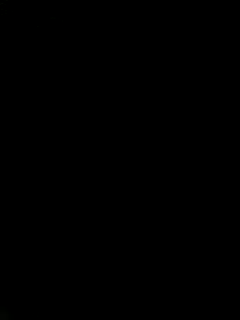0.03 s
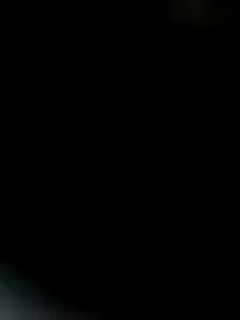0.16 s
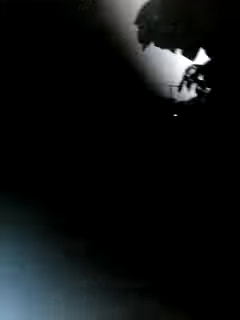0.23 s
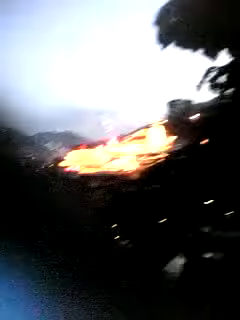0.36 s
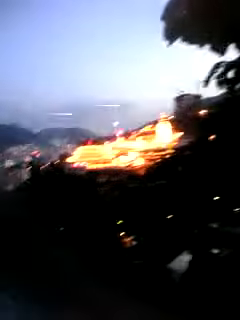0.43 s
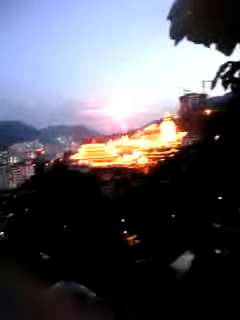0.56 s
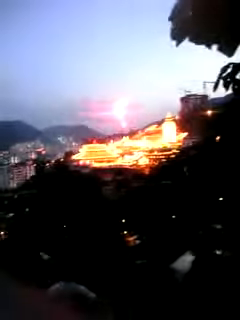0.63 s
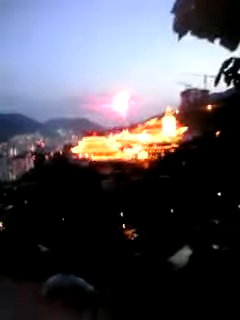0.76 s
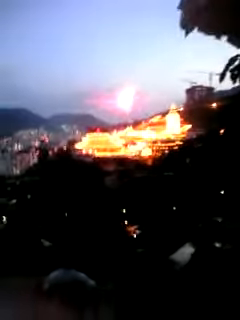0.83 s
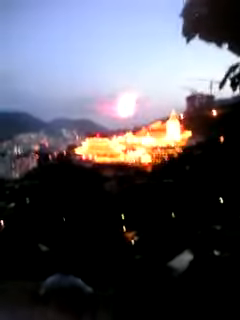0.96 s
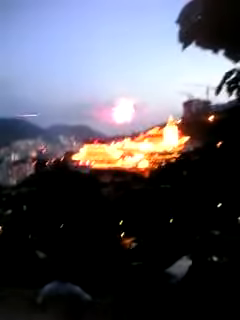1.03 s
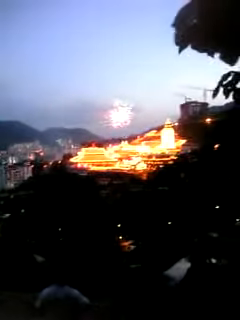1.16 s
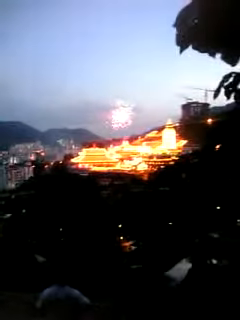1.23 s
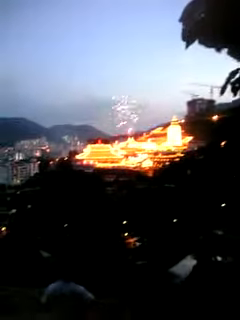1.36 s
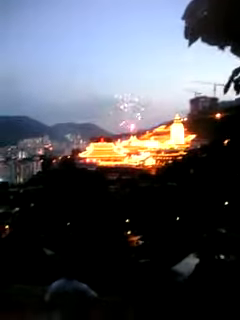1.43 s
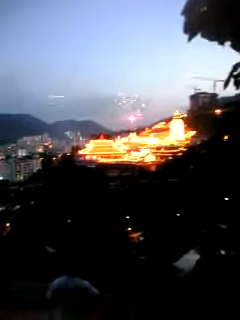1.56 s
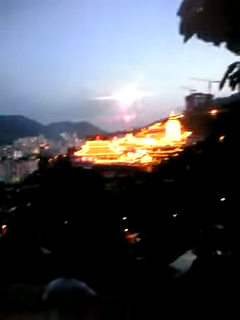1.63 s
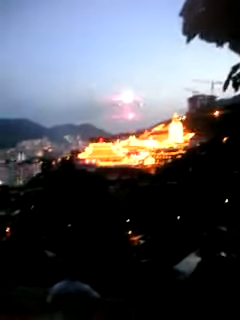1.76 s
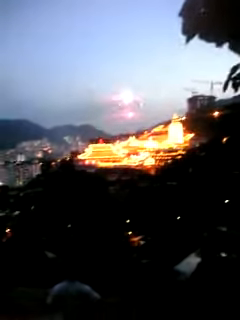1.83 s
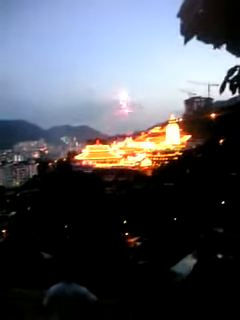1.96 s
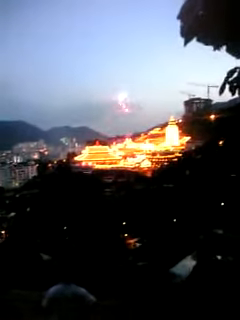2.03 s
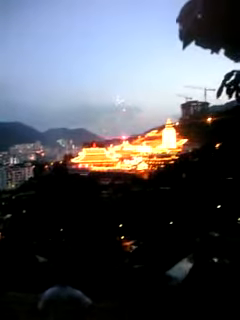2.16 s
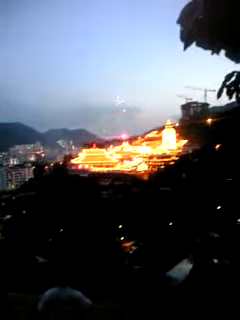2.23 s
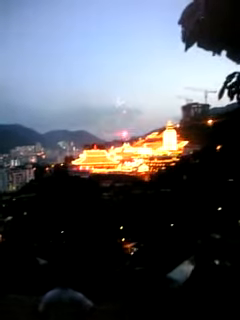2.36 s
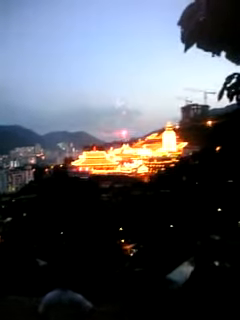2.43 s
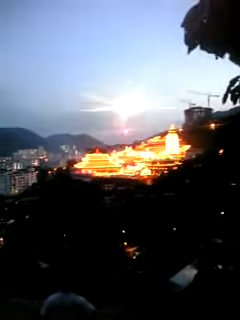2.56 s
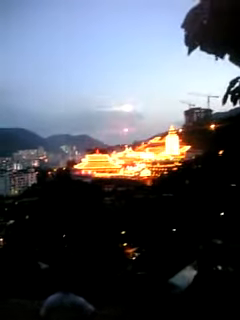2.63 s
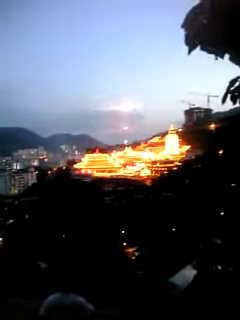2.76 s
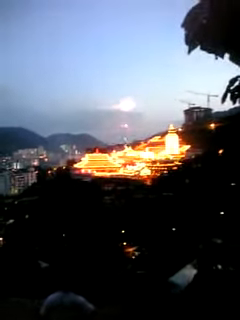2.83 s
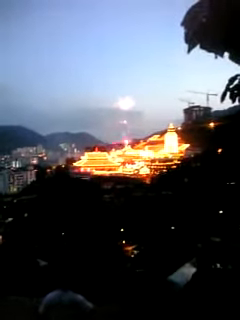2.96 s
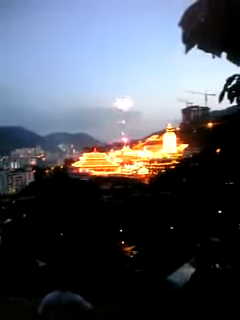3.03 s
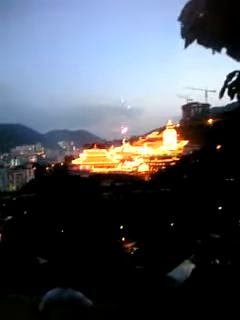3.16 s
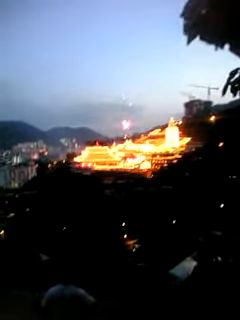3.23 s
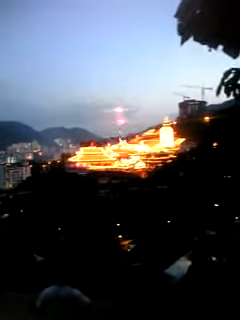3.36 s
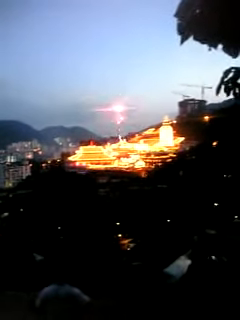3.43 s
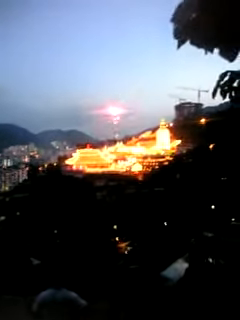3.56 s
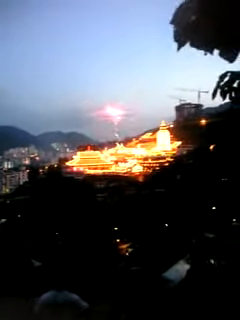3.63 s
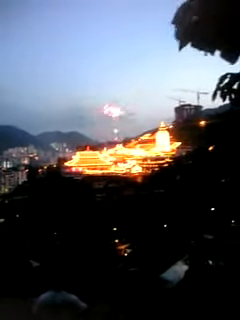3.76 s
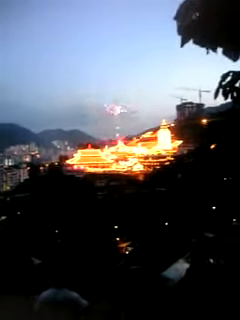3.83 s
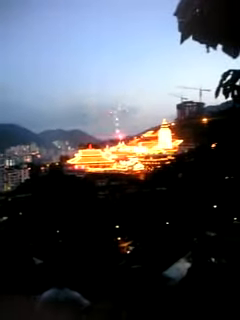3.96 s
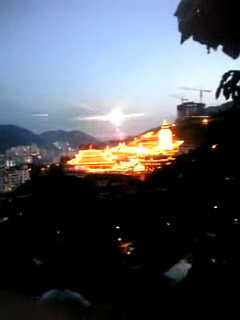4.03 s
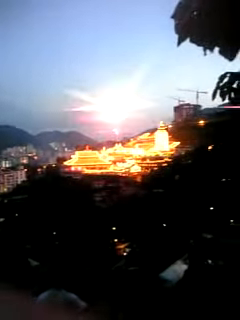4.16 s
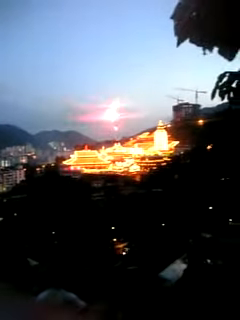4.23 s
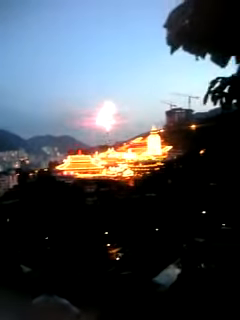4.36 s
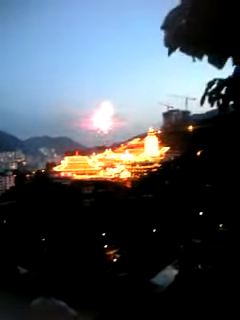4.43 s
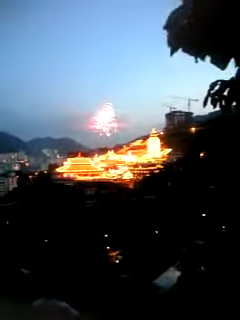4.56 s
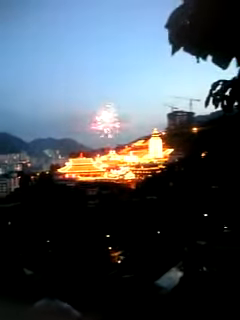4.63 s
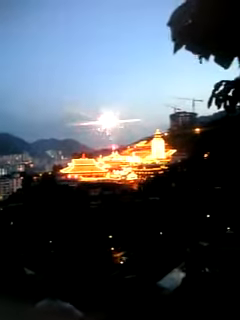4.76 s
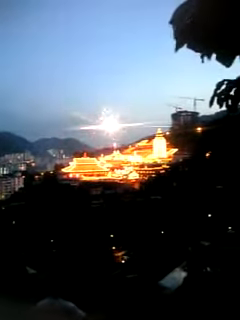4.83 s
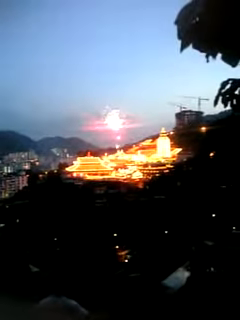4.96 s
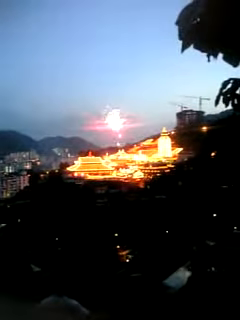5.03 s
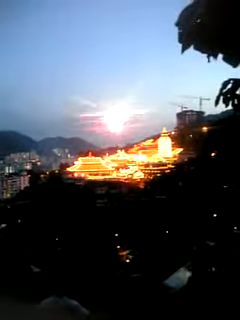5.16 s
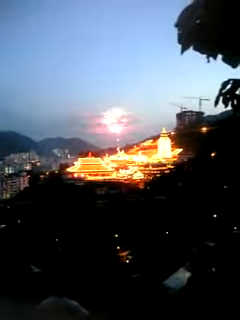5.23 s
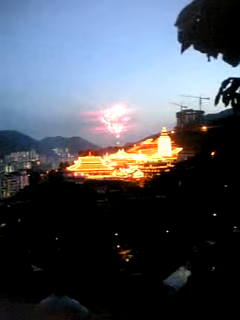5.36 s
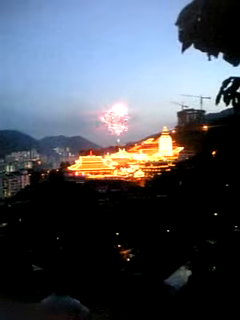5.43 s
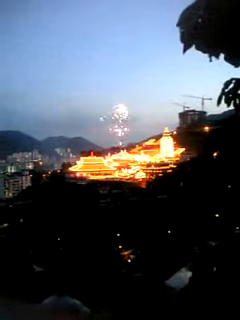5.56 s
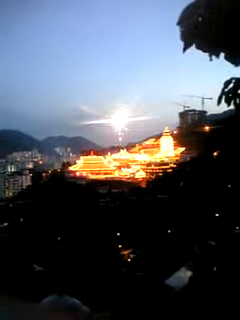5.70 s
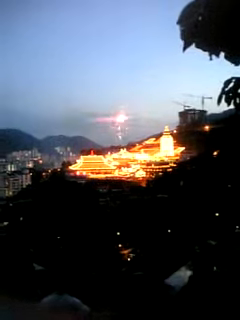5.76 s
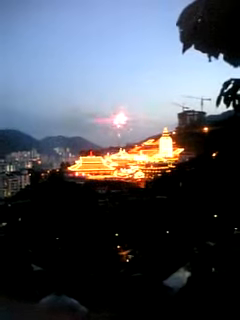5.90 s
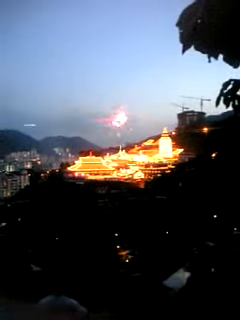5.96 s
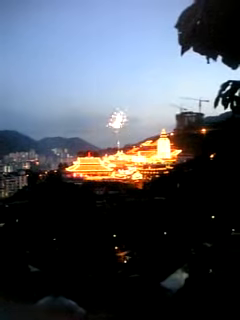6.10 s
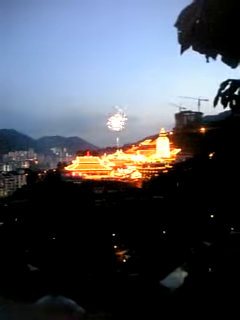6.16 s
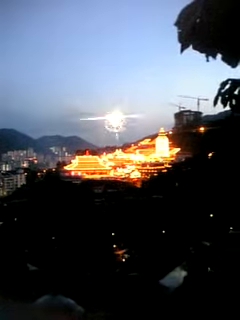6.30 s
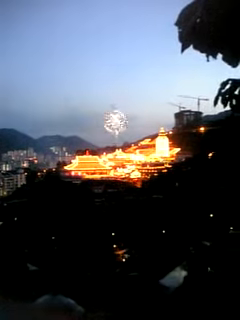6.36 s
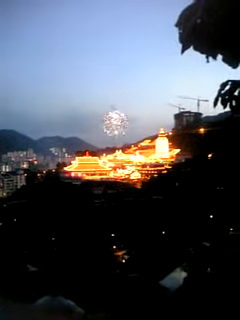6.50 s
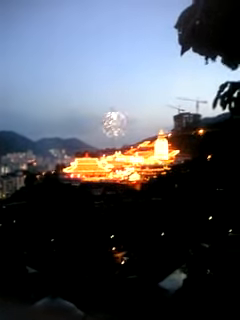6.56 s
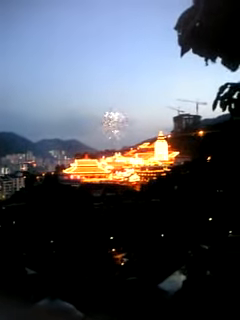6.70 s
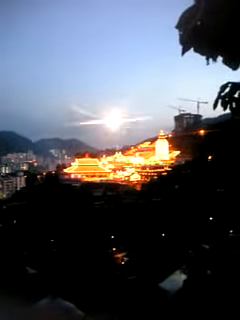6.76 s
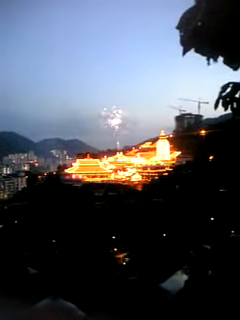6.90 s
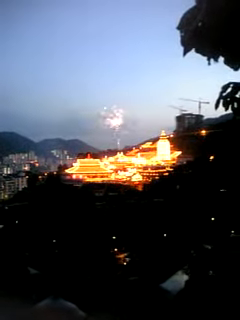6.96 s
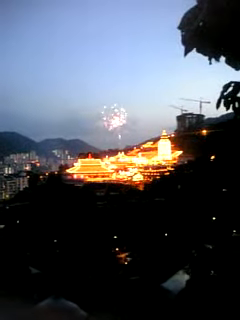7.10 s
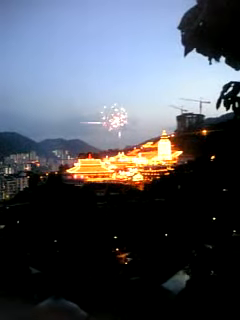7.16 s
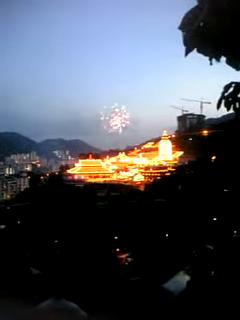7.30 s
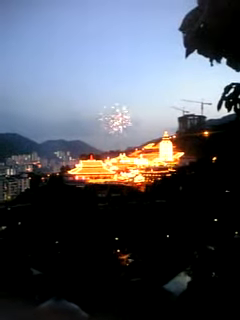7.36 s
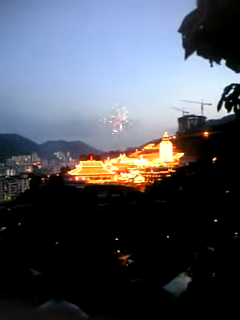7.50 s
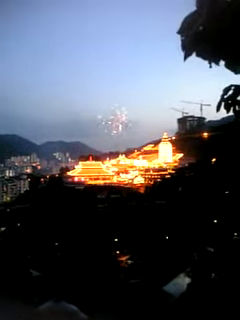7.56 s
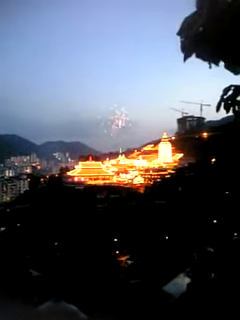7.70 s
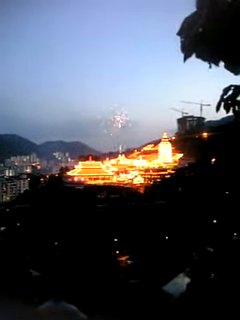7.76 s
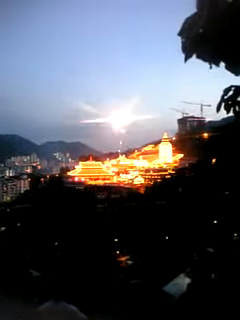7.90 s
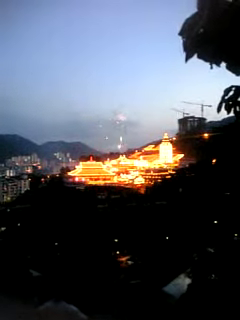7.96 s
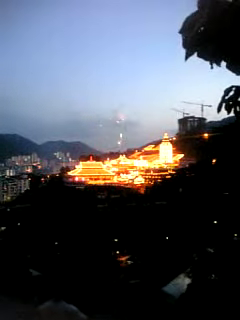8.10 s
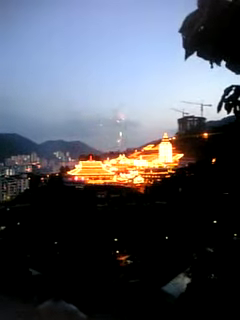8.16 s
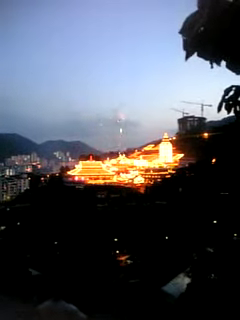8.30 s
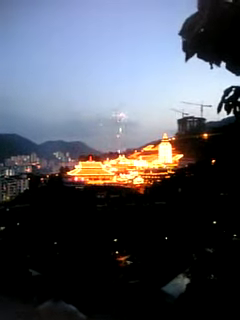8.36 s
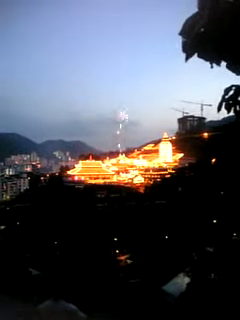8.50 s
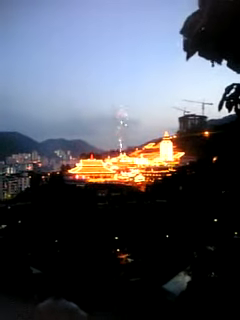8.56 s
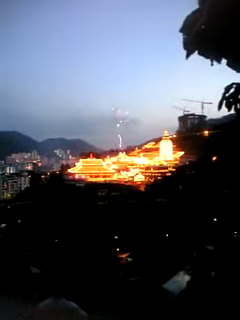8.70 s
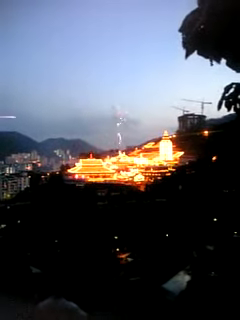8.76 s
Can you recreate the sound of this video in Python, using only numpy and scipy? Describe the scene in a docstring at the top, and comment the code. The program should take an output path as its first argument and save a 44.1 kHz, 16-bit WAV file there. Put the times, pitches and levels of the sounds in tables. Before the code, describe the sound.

Loud firework shells bang in quick volleys across a valley, with crackling and long rolling echoes.

```python
"""Firework shells burst in volleys over a hillside town, heard from across a valley.
Each blast rings the case of a small microphone and overloads it. A facade and the houses behind it
slap it back, and the slopes scatter it into a crackling wash and a long rolling echo.
Single stars crack in the gaps, over a bed of rumble and crackle from fireworks further off."""
import sys
import numpy as np
from scipy import signal
from scipy.fft import rfft, irfft, next_fast_len
from scipy.io import wavfile
from scipy.ndimage import uniform_filter1d

SR = 44100
rng = np.random.default_rng(int(sys.argv[2]) if len(sys.argv) > 2 else 0)


def store_wav(level_fs):
    """Save 16-bit WAV to argv[1]."""
    pcm = np.round(np.clip(np.atleast_2d(level_fs), -1, 1) * 32767)
    wavfile.write(sys.argv[1], SR, pcm.T.astype(np.int16))


N = 388962

# shell bursts; facade_db is relative to the burst:
# start_s, blast_db, facade_lag_s, facade_db, crackle_db, sizzle_db, valley_db
SHELL_BURSTS = [(.397, 5, 0.055, -1, -11.5, -30, -18), (1.27, -7, 0.059, -12, -25.5, -42, -35.5),
                (1.569, 8.5, 0.055, -2.5, -7.5, -22, -14.5), (1.688, 7.5, 0.054, -2.5, -9.5, -24, -16),
                (2.183, 5.5, .044, -1.5, -11, -27, -17.5), (2.791, 3, 0.059, -3, -13, -32, -22),
                (3.142, -14.5, 0.042, -12.5, -27, -44, -44.5), (3.614, 1.5, 0.073, -19.5, -17, -42, -28),
                (3.895, 1.5, 0.051, 2, -12.5, -15.5, -17.5), (4.571, 2, .055, -21, -14, -34, -31),
                (4.702, 3.5, 0.05, -4, -13.5, -33, -20.5), (5.465, 6.5, 0.072, -4.5, -16.5, -25, -24.5),
                (5.507, 8.5, 0.056, -5.5, -13.5, -34, -14.5), (5.602, 3.5, 0.06, -2, -13.5, -24, -27.5),
                (5.791, 5.5, 0.051, 1.5, -14.5, -25.5, -19.5), (6.241, 5.5, .055, -1, -14, -27, -14.5),
                (6.337, 5, .052, -4.5, -13, -30, -25.5), (6.667, 5.5, .055, -6.5, -11.5, -27.5, -16),
                (6.761, 4.5, 0.058, -6.5, -10, -20.5, -19), (7.326, 3, 0.051, -1.5, -10, -19.5, -20.5),
                (7.641, 2, 0.045, 1.5, -13.5, -22.5, -17), (8.007, 3, 0.055, -1.5, -16.5, -24.5, -20.5),
                (8.514, 5, 0.047, 0.5, -13, -20, -16)]
# slaps off the facade and the houses behind it, relative to the facade echo: lag_s, boom_db, crackle_db
HOUSE_SLAPS = [(0, -1.5, -1.5), (.017, -4, -10.5), (.038, -6, -14.5), (.093, -15.5, -17)]
# lone cracks between the bursts, plus the sharp crack of the faint burst at 1.27 s: start_s, level_db,
# pitch_hz, width_hz, t60_s
STAR_CRACKS = [(.210, -8, 1130, 880, 0.018), (0.805, -11, 1040, 504, 0.035),
               (.948, -16.5, 2630, 700, 0.046), (1.271, -19, 1390, 1500, 0.044),
               (1.521, -19, 2170, 1500, .04), (3.341, -24, 2680, 1500, 0.03), (3.499, -25, 2290, 1490, .04),
               (5.077, -18, 1100, 790, .027), (7.263, -23, 1960, 1780, 0.073),
               (8.227, -14.5, 2320, 1174, 0.48), (8.259, -7.5, 2290, 1300, 0.079)]
# level ride of the far fireworks, busier toward the end: time_s, rumble_db, crackle_db
FAR_LEVELS = [(0, -25, -31), (1.3, -30, -38.5), (2.5, -25, -34), (3.1, -27.5, -34), (3.7, -29, -36),
              (5.4, -30, -34), (6.1, -23.5, -27), (8.8, -23, -33)]
# tone of the far thuds: frequency_hz, level_db
FAR_THUD_EQ = [(30, -29.5), (90, -20), (180, -17), (260, -5), (330, 2.5), (470, -2.5), (650, -13),
               (1100, -24), (2000, -44.5)]
# tone of the far crackle: frequency_hz, level_db
FAR_CRACKLE_EQ = [(200, -23.5), (600, 4), (1050, 8.5), (1800, 1.5), (3300, -5.5), (3900, -31.5),
                  (4700, -33)]
# tone of the valley echo: frequency_hz, level_db
VALLEY_EQ = [(30, -28.5), (90, -20), (180, -19.5), (310, 6.5), (430, 3.5), (680, -11), (1050, -2),
             (1600, -16), (2500, -16), (3300, -22.5), (3900, -49), (4700, -46)]
# tone of the near scatter: frequency_hz, level_db
SCATTER_EQ = [(30, -38.5), (90, -11.5), (180, -13.5), (320, 0), (450, 6), (680, -7), (1050, -3.5),
              (1600, -10), (2500, -11), (3300, -15), (3900, -36.5), (4700, -43.5)]
# tone of the pressure wave: frequency_hz, level_db
BLAST_EQ = [(30, -44), (90, -18.5), (180, 3.5), (270, 8), (340, -1), (470, 5.5), (680, -5), (1050, -5),
            (1800, -5), (3300, -15.5), (3900, -38.5), (4700, -11.5)]

VALLEY_LAG_S, VALLEY_RISE_S, VALLEY_T60_S = .025, 0.062, 1.996
WALL_LAG_S, WALL_BOOM_DB, WALL_CRACKLE_DB = .023, -10, -6.5  # a wall close by answers first
SNAP_HZ, SNAP_WIDTH_HZ, SNAP_T60_S, SNAP_DB = 1280, 1410, 0.044, -2  # level relative to the crackle
SIZZLE_HZ, SIZZLE_WIDTH_HZ, SIZZLE_RISE_S, SIZZLE_T60_S = 2700, 1500, 0.0052, .25
CASE_HZ, CASE_T60_S, CASE_DB = 334, 0.04, 3
SWITCH_ON_S, BANDWIDTH_HZ, TOP_HZ = .069, 4900, 16000
CEILING, KNEE = .72, .08
SHELF_HZ, SHELF_DB = 4320, -6.5
RASP_HZ, RASP_WIDTH_HZ, RASP_DB = 7970, 1500, -11.5  # the input lifts a narrow band near 8 kHz


def undb(db):
    """Decibels to gain."""
    return 10 ** (np.asarray(db) / 20)


def unit_rms(x):
    """Scale to rms 1."""
    return x / np.sqrt(np.mean(x ** 2))


def add(track, start_s, sound):
    """Mix a sound into a track from start_s on."""
    i = max(int(start_s * SR), 0)
    track[i:i + len(sound)] += sound[:N - i]


def equalise(x, curve, size=4096):
    """Causal EQ of unit power gain, shaped by (frequency_hz, level_db) points."""
    hz, db = np.transpose(curve)
    bin_hz = np.arange(size // 2 + 1) * SR / size
    gain = undb(np.interp(np.log(bin_hz + 1), np.log(hz), db))
    # minimum phase keeps the attacks sharp
    cepstrum = irfft(np.log(gain))
    cepstrum[1:size // 2] *= 2
    cepstrum[size // 2 + 1:] = 0
    response = irfft(np.exp(rfft(cepstrum)))
    return signal.fftconvolve(x, response / np.linalg.norm(response))[:len(x)]


def band(x, hz, width_hz):
    """Steep band-pass around a centre frequency."""
    high = (width_hz + np.hypot(width_hz, 2 * hz)) / 2
    return signal.sosfilt(signal.butter(3, [high - width_hz, high], "bandpass", fs=SR, output="sos"), x)


def mic_rolloff(x, cutoff_hz=3780):
    """The microphone's narrow band dulls the top of each crack."""
    return signal.sosfilt(signal.butter(6, cutoff_hz, fs=SR, output="sos"), x)


def clicks(per_s, spread_db):
    """A random hail of clicks of unequal size, rms 1."""
    arrives = rng.random(N) < per_s / SR
    strength = undb(spread_db * np.clip(rng.standard_normal(N), -2, 2))
    return unit_rms(arrives * strength * rng.choice([-1, 1], N))


def swell(rise_s, t60_s, size=SR):
    """An envelope that builds up and dies away."""
    t = np.arange(size) / SR
    return (1 - np.exp(-t / rise_s)) * np.exp(-np.log(1000) * t / t60_s)


def flutter(rate_hz, depth_db):
    """A gain that wanders at random, about rate_hz times a second."""
    hold = int(SR / rate_hz)
    steps = np.repeat(rng.standard_normal(N // hold + 1), hold)[:N]
    return undb(depth_db * uniform_filter1d(steps, hold))


def shimmer(x, rate_hz, depth_db, count=18):
    """Reflections interfere: each narrow band swells and fades on its own."""
    size = next_fast_len(N)
    bin_hz = np.arange(size // 2 + 1) * SR / size
    band_index = np.interp(np.log(bin_hz + 1), np.log([250, 3600]), [0, count - 1])
    spectrum = rfft(x, size)
    masks = (np.maximum(1 - np.abs(band_index - k), 0) for k in range(count))
    return sum(irfft(spectrum * mask, size)[:N] * flutter(rate_hz, depth_db) for mask in masks)


def pile_up(starts_s, levels_db, envelope):
    """Joint envelope of overlapping hits: their powers add up."""
    power = np.zeros(N)
    for start_s, level_db in zip(starts_s, levels_db):
        add(power, start_s, (undb(level_db) * envelope) ** 2)
    return np.sqrt(power)


def arrivals():
    """Each burst lands directly, off the near wall, then off the houses: start_s, boom_db, crackle_db."""
    rows = []
    for start_s, blast_db, facade_lag_s, facade_db, crackle_db, _, _ in SHELL_BURSTS:
        houses = np.array(HOUSE_SLAPS) + (facade_lag_s, facade_db, facade_db)
        paths = [(0, 0, 0), (WALL_LAG_S, WALL_BOOM_DB, WALL_CRACKLE_DB), *houses]
        rows.extend(np.array(paths) + (start_s, blast_db, crackle_db))
    return np.array(rows)


def far_fireworks():
    """The bed: overlapping dull thuds and a fine crackle from further off."""
    time_s, *levels_db = np.transpose(FAR_LEVELS)
    rumble_db, crackle_db = (np.interp(np.arange(N) / SR, time_s, db) for db in levels_db)
    thuds = equalise(clicks(per_s=400, spread_db=4.0) * undb(rumble_db), FAR_THUD_EQ)
    crackle = equalise(clicks(per_s=2500, spread_db=0.5) * undb(crackle_db), FAR_CRACKLE_EQ)
    return thuds + shimmer(crackle, rate_hz=25, depth_db=2.0)


def stars(tail_gain=0.23, size=SR // 4):
    """Single stars crack short and dry, each in its own register: one snap and its scattered tail."""
    track = np.zeros(N)
    for start_s, level_db, pitch_hz, width_hz, t60_s in STAR_CRACKS:
        crack = tail_gain * rng.standard_normal(size) * swell(rise_s=0.00056, t60_s=t60_s, size=size)
        crack[0] += 2  # the snap
        crack = band(crack, pitch_hz, width_hz)
        add(track, start_s, undb(level_db) * crack / np.abs(crack).max())
    return mic_rolloff(track)


def hillside():
    """Houses and trees scatter each burst at once; the valley rolls it back later, duller and lumpy."""
    arrival_s, _, crackle_db = arrivals().T
    burst_s, *_, valley_db = np.transpose(SHELL_BURSTS)
    # the first reflections crowd in right behind the wave front
    front = undb(1.5) * swell(rise_s=0.00016, t60_s=0.018)
    wash = swell(rise_s=0.0041, t60_s=0.41)
    long_tail = swell(VALLEY_RISE_S, VALLEY_T60_S, size=3 * SR)
    scatter = clicks(per_s=3500, spread_db=2.5) * pile_up(arrival_s, crackle_db, front + wash)
    valley = clicks(per_s=1700, spread_db=2.5) * pile_up(burst_s + VALLEY_LAG_S, valley_db, long_tail)
    valley *= flutter(rate_hz=41, depth_db=1.5)
    valley = shimmer(valley, rate_hz=28, depth_db=3.5)
    scatter = shimmer(scatter, rate_hz=35, depth_db=2.0)
    return undb(1.0) * equalise(scatter, SCATTER_EQ) + undb(3.5) * equalise(valley, VALLEY_EQ)


def charges():
    """The burst charge gives a dry snap, which the walls repeat; its stars catch fire with a sizzle."""
    arrival_s, _, crackle_db = arrivals().T
    burst_s, *_, sizzle_db, _ = np.transpose(SHELL_BURSTS)
    snaps = pile_up(arrival_s, crackle_db + SNAP_DB, swell(rise_s=0.00051, t60_s=SNAP_T60_S))
    sizzles = pile_up(burst_s, sizzle_db, swell(SIZZLE_RISE_S, SIZZLE_T60_S))
    snap_noise = unit_rms(band(rng.standard_normal(N), SNAP_HZ, SNAP_WIDTH_HZ))
    sizzle_noise = unit_rms(band(rng.standard_normal(N), SIZZLE_HZ, SIZZLE_WIDTH_HZ))
    return mic_rolloff(snaps * snap_noise + sizzles * sizzle_noise)


def blasts(wave_s=0.00113, crack_db=-13, pitch_spread=.09, bounce_db=-11, bounce_s=.03, bounces=4):
    """An N-shaped pressure wave hits and rings the microphone's case; nearby walls repeat its crack."""
    cracks, booms = np.zeros(N), np.zeros(N)
    t = np.arange(SR // 6) / SR
    n_wave = np.linspace(1, -1, int(SR * wave_s) + 2)
    ring = swell(rise_s=0.003, t60_s=CASE_T60_S, size=len(t))
    for start_s, level_db, _ in arrivals():
        add(cracks, start_s, undb(level_db) * n_wave)
        for lag, strength in rng.random((bounces, 2)):
            add(cracks, start_s + bounce_s * lag, undb(level_db + bounce_db) * 2 * strength * n_wave)
        # the case booms for a few strong cycles, each time a little higher or lower
        pitch_hz = CASE_HZ * np.exp(pitch_spread * rng.uniform(-1.88, 2.16))
        add(booms, start_s, undb(level_db) * ring * np.sin(2 * np.pi * pitch_hz * t))
    return undb(crack_db) * equalise(cracks, BLAST_EQ) + undb(CASE_DB) * booms


def scene():
    """The mono mix: shells and their echoes up front, stars and far fireworks behind."""
    return (blasts() + charges() + hillside() + stars() + far_fireworks())[None]


def record(dry):
    """A narrow-band input switches on; loud peaks round off and clip, which alone makes the top end."""
    fade_in = np.clip((np.arange(N) / SR - SWITCH_ON_S) / .001, 0, 1)
    narrow = signal.sosfilt(signal.ellip(10, .3, 70, BANDWIDTH_HZ, fs=SR, output="sos"), dry * fade_in)
    below_knee = np.clip(narrow, KNEE - CEILING, CEILING - KNEE)
    clipped = below_knee + KNEE * np.tanh((narrow - below_knee) / KNEE)
    # a treble shelf takes the edge off the crunch
    body = signal.sosfiltfilt(signal.butter(6, SHELF_HZ, fs=SR, output="sos"), clipped)
    treble = undb(SHELF_DB) * (clipped - body)
    rasp = undb(RASP_DB) * band(clipped, RASP_HZ, RASP_WIDTH_HZ)
    return signal.sosfilt(signal.ellip(8, .2, 70, TOP_HZ, fs=SR, output="sos"), body + treble + rasp)


dry = scene()
out = record(dry)
store_wav(out)
```